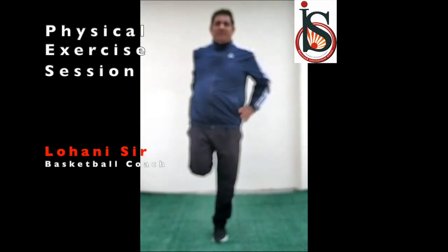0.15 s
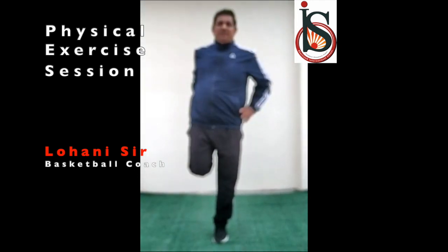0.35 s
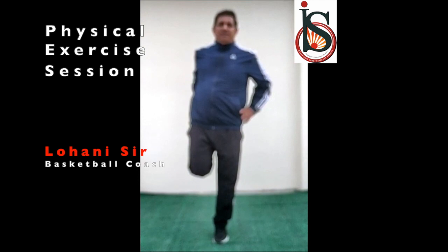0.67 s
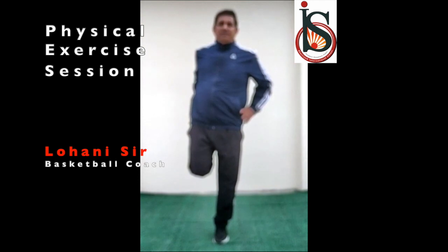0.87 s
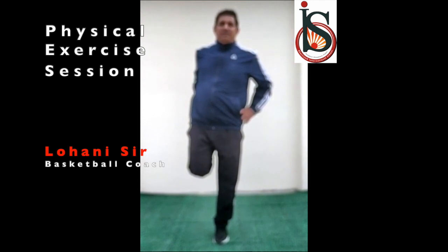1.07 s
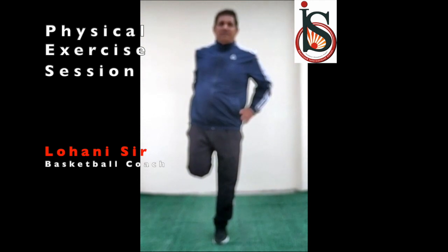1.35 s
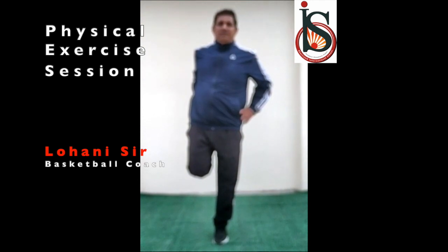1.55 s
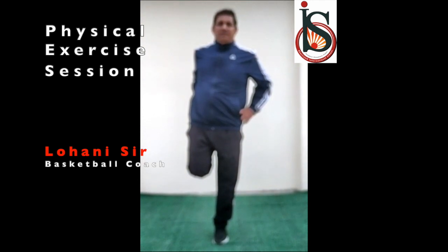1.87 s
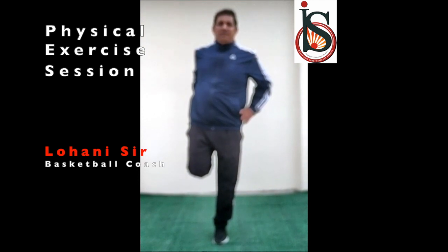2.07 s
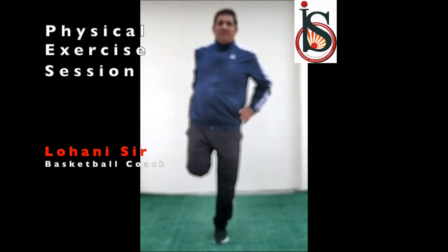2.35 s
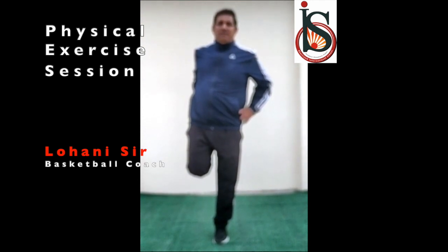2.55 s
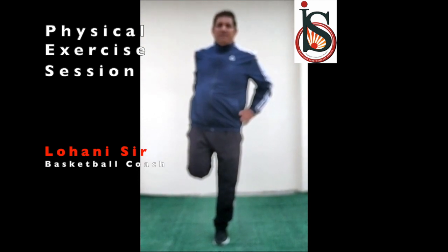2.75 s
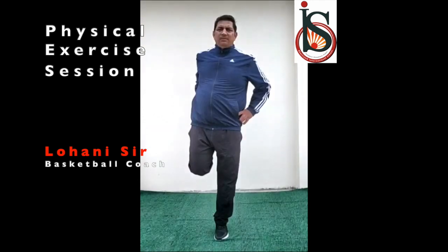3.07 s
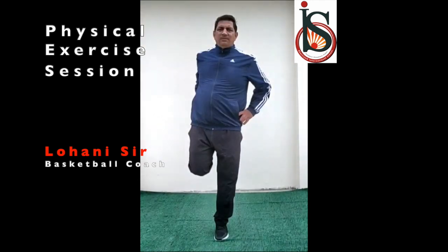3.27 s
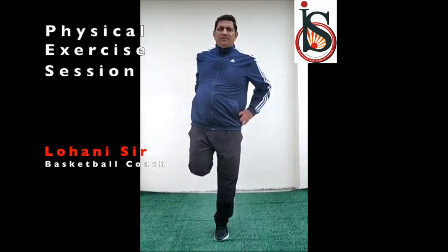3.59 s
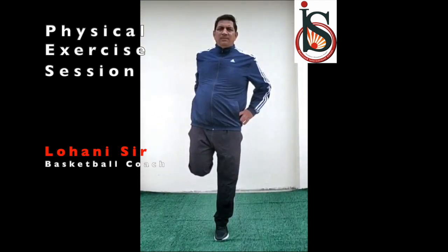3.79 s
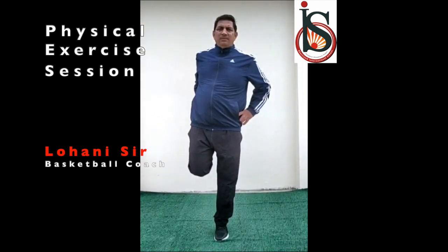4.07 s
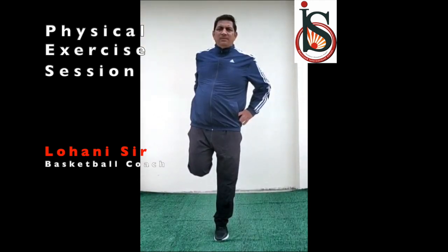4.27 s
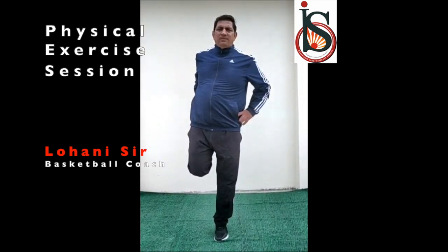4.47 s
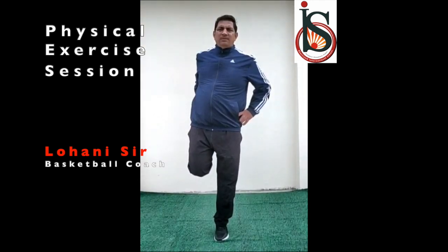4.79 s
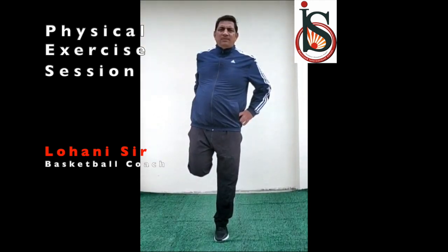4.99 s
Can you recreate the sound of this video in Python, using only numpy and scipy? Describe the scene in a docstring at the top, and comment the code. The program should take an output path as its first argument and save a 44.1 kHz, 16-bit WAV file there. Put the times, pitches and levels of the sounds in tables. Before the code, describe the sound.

Outdoors among walls, a dove-like bird repeats short, hoarse hoots over a faint low background hum. A nearer bird gives two sharp, falling chirps, and air thumps softly on the right side of the microphone. The hoots pause briefly and resume. Near the end, whistles and chips of farther birds crowd in, with a third sharp chirp and a few more thumps.

```python
"""Outdoors among walls, over a quiet murmur, a dove-like bird starts short hoots, hoarse from the uneven
airflow in its throat. From about 1 s, pushes of air thump softly on the right microphone port. A nearer
bird gives sharp, falling chirps through its opening beak at 1.3 s and 2.8 s. The hoots pause, then resume
at 3.5 s. In the last second the chips and whistles of farther birds crowd in, with a few more thumps
and a third chirp at 4.9 s."""
import sys
import numpy as np
from scipy import signal
from scipy.fft import rfft, irfft, next_fast_len
from scipy.io import wavfile
from scipy.ndimage import uniform_filter1d, map_coordinates

SR = 44100
rng = np.random.default_rng(int(sys.argv[2]) if len(sys.argv) > 2 else 0)


def wav_record(signal):
    """Record a signal, one row per channel, as 16-bit PCM in the file named by sys.argv[1]."""
    frames = np.transpose(np.atleast_2d(signal))
    bounded = np.clip(frames, -1, 1)
    # unit amplitude maps onto the largest positive 16-bit level
    quanta = np.round(bounded * 32767).astype(np.int16)
    wavfile.write(sys.argv[1], SR, quanta)


N = 226385
TIME = np.arange(N) / SR


def amp(db):
    """Decibels to gain."""
    return 10 ** (np.asarray(db) / 20)


def unit(x):
    """Scale to rms 1."""
    return x / np.sqrt(np.mean(np.abs(x) ** 2) + 1e-20)


def along(points, hz):
    """Read (freq_hz, value) points on a log frequency axis."""
    freqs, values = np.transpose(points)
    return np.interp(np.log(hz + 1), np.log(freqs + 1), values)


def wobble(rate, size):
    """A smooth random modulator, rate knots a second."""
    knots = rng.standard_normal(int(size * rate / SR) + 4)
    return map_coordinates(knots, [np.arange(size) * rate / SR])


def filtered(x, response):
    """Apply a frequency response."""
    size = next_fast_len(N + 8192)
    return irfft(rfft(x, size) * response(np.fft.rfftfreq(size, 1 / SR)), size)[..., :N]


def eq(x, curve):
    """Colour a sound with (freq_hz, gain_db) points."""
    return filtered(x, lambda hz: amp(along(curve, hz)))


def noise(curve, side_db):
    """Coloured stereo noise of rms 1; side_db sets the width."""
    mid, side = eq(rng.standard_normal((2, N)), curve)
    return unit(np.array([mid + amp(side_db) * side, mid - amp(side_db) * side]))


def patchy(x, depth_db):
    """Random patches of gain over time and frequency, scaled to rms 1."""
    spectra = signal.stft(x, nperseg=512)[2]
    patches = uniform_filter1d(rng.standard_normal(spectra.shape[1:]), size=6, axis=0)
    patches = unit(uniform_filter1d(patches, size=12, axis=1))
    return unit(signal.istft(spectra * amp(depth_db * patches), nperseg=512)[1][:, :N])


def add(track, start_s, sound, pan_db):
    """Place a sound in a stereo track; pan_db is left minus right."""
    gains = amp([[pan_db / 2], [-pan_db / 2]])
    part = track[:, max(round(start_s * SR), 0):][:, :sound.shape[-1]]
    part += gains / gains.mean() * sound[..., :part.shape[1]]


def gate(t, fade_s):
    """Fade a note in and out."""
    return np.sin(np.pi / 2 * np.clip(np.minimum(t - t[0], t[-1] - t) / fade_s, 0, 1)) ** 2


def phase_of(hz):
    """Running phase of a pitch curve."""
    return 2 * np.pi * np.cumsum(hz) / SR


# Fader rides of the ambience: time_s, murmur_db, rustle_db
BED_RIDES = [(0.0, -60.5, -64.5), (0.31, -62, -72), (1.07, -67, -71.5), (1.51, -58, -68.5),
             (1.94, -64, -74.5), (2.83, -65, -72), (3.01, -62, -62.5), (3.79, -62.5, -67),
             (4.26, -66.5, -79), (4.46, -55, -63.5), (4.73, -63, -60.5), (5.13, -54, -51)]
# Tone of the three noise beds: freq_hz, gain_db
MURMUR_EQ = [(25, -23.5), (60, -3.5), (85, -14.5), (104, 6.5), (125, -16.5), (190, -2.5), (320, 5.5),
             (450, -4), (660, 0.5), (850, -11.5), (1200, -25), (2500, -53)]
RUSTLE_EQ = [(600, -13), (1200, -12.5), (1900, 3.5), (2800, -12), (3900, -5), (5200, -16.5), (8000, -26.5),
             (15000, -29)]
HISS_EQ = [(500, 7), (3000, 3.5), (6500, 2), (9000, 3.5), (11000, 2), (14000, 5), (15200, 2.5)]
def ambience(murmur_trim_db=5.0, rustle_trim_db=-1.5, hiss_db=-70):
    """The bed: a low distant murmur, an uneven far-off rustle and the microphone's hiss."""
    times, murmur_db, rustle_db = np.transpose(BED_RIDES)
    murmur = patchy(noise(MURMUR_EQ, side_db=-13.5), depth_db=3)
    murmur *= amp(np.interp(TIME, times, murmur_db) + murmur_trim_db)
    rustle = patchy(noise(RUSTLE_EQ, side_db=-3.5), depth_db=4.5)
    rustle *= amp(np.interp(TIME, times, rustle_db) + rustle_trim_db)
    hiss = amp(hiss_db) * patchy(noise(HISS_EQ, side_db=0.5), depth_db=2.0)
    return murmur + rustle + hiss


# Ring time of the yard, before decay_scale: freq_hz, t60_s
YARD_DECAY = [(150, .4), (700, .6), (2000, 0.6), (4000, 0.87), (7000, 0.75), (12000, 0.067)]
def yard_reverb(x, decay_scale, predelay_s):
    """The walls answer with a diffuse tail whose top end dies first."""
    hz, t, spectra = signal.stft(rng.standard_normal((2, SR)), SR, nperseg=256)
    t60_s = decay_scale * along(YARD_DECAY, hz)[:, None]
    tail = signal.istft(spectra * amp(-60 * t / t60_s), SR, nperseg=256)[1]
    tail = np.pad(tail / np.linalg.norm(tail[0]), ((0, 0), (int(predelay_s * SR), 0)))
    return signal.fftconvolve(x, tail, axes=1)[:, :N]


def reflections(x, first_s, spread_s, count):
    """A few separate bounces, different at each microphone port."""
    delays = first_s + spread_s * rng.random((count, 2, 1))
    return filtered(x, lambda hz: np.exp(-2j * np.pi * hz * delays).sum(0)) / np.sqrt(count)


# What a farther wall sends back: freq_hz, gain_db
FAR_WALL_EQ = [(1500, -5.5), (3500, 3), (4400, -4.5), (5500, -7.5), (9000, -27.5)]
def slapback(x):
    """A farther wall returns a late, dull repeat."""
    return reflections(eq(x, FAR_WALL_EQ), first_s=.065, spread_s=.03, count=3)


def chatter(count=36, level_db=-75, spread_db=2.0, middle_hz=3100, glide=0.085):
    """Many birds far away: a sprinkle of faint, mostly falling glides."""
    out = np.zeros((2, N))
    for when, (pitch, slope, life, size, side) in zip(rng.random(count), rng.standard_normal((count, 5))):
        t = np.arange(int(.04 * np.exp(.3 * life) * SR)) / SR
        hz = middle_hz * np.exp(.2 * pitch + glide * (slope - 1) * t / t[-1])
        note = amp(level_db + spread_db * size) * np.sin(phase_of(hz)) * gate(t, t[-1] / 2)
        add(out, when * N / SR, note, pan_db=3 * side)
    return out


# Faint low coos: start_s, length_s, pitch_hz, level_db
COOS = [(0.143, 0.075, 334, -58), (0.586, 0.031, 350, -47), (0.76, 0.049, 337, -53.5),
        (4.345, .125, 335, -51), (5.068, 0.066, 352, -57.5)]
# Distant caws: start_s, length_s, level_db
CAWS = [(0.172, 0.27, -64), (0.658, 0.35, -69)]
# Rasp of a caw: freq_hz, gain_db
CAW_EQ = [(900, -27.5), (1350, 5), (1600, 7), (1900, 10), (2200, -21.5), (3000, -35.5)]
def coos_and_caws(waver=0.055):
    """Wavering sine coos and caws of swelling noise, tucked into the murmur."""
    out, rasp = np.zeros((2, N)), noise(CAW_EQ, side_db=-13.5)
    for start, length, hz, db in COOS:
        t = np.arange(int(length * SR)) / SR
        tone = unit(np.sin(phase_of(hz * (1 + waver * wobble(63, len(t))))))
        add(out, start, amp(db) * tone * gate(t, fade_s=0.013), pan_db=0)
    for start, length, db in CAWS:
        out += amp(db) * rasp * np.sin(np.pi * np.clip((TIME - start) / length, 0, 1))
    return out


# Calls of farther birds: start_s, length_s, from_hz, to_hz, level_db, pan_db
CHIPS = [(0, 0.033, 5180, 5107, -59.5, -4), (0.267, 0.35, 3420, 2954, -77.5, -28),
         (0.625, 0.057, 4660, 4730, -78, -9.5), (0.761, 0.084, 3074, 2260, -58, -10),
         (0.926, 0.035, 2190, 1938, -48, -19), (1.512, 0.03, 5100, 5720, -59.5, -12),
         (2.093, 0.032, 2930, 2770, -69.5, -12), (2.293, 0.041, 4950, 5230, -64, -12),
         (2.563, 0.036, 4260, 5410, -73, -14.5), (3.376, 0.029, 4140, 3966, -56, 8.5),
         (3.608, 0.1, 2885, 2465, -62.5, -16.5), (4.235, 0.04, 1738, 2430, -59, -9.5),
         (4.263, 0.1, 4460, 3810, -63, 15), (4.291, 0.06, 2940, 2320, -45.5, -6.5),
         (4.322, 0.05, 4185, 3420, -52, -2), (4.399, 0.071, 5310, 5050, -65, -3.5),
         (4.454, 0.055, 2078, 1808, -50, -29), (4.573, .055, 4120, 3276, -52, -9.5),
         (4.614, 0.068, 2047, 1900, -45.5, -24), (4.663, 0.022, 4640, 5170, -65, 0),
         (4.76, 0.015, 2450, 2670, -55, 9), (4.799, 0.059, 2176, 2510, -57, -14),
         (4.831, 0.085, 3745, 3430, -48, -15), (4.85, 0.046, 3260, 2454, -39, -7),
         (4.888, 0.048, 2500, 2030, -52.5, 25), (4.979, 0.052, 2120, 1810, -48, -12),
         (5.021, 0.041, 2192, 2440, -37, -0.5), (5.082, 0.039, 3900, 3300, -50, -3)]
def chips(overtone_db=-32, shimmer_db=1.5, jitter=.018):
    """Short, slightly unsteady whistled glides, each swelling and fading."""
    out = np.zeros((2, N))
    for start, length, from_hz, to_hz, db, pan_db in CHIPS:
        t = np.arange(int(length * SR)) / SR
        phase = phase_of(np.geomspace(from_hz, to_hz, len(t)) * (1 + jitter * wobble(450, len(t))))
        tone = np.sin(phase) + amp(overtone_db) * np.sin(2 * phase)
        voice = unit(tone * amp(shimmer_db * wobble(140, len(t))))
        add(out, start, amp(db) * voice * gate(t, fade_s=.22 * length), pan_db)
    return out


# Flutters of air on the microphone ports: start_s, length_s, level_db (before trim), pitch_hz, pan_db
THUMPS = [(0.863, 0.034, -38.5, 83, -21), (1.288, .01, -40, 71, -24), (1.447, 0.15, -21, 104, -31.5),
          (1.819, 0.013, -23.5, 113, -44), (1.889, 0.14, -16, 110.3, -45),
          (2.129, 0.0056, -31.5, 99, -17.5), (2.307, 0.13, -34, 83, -6.5), (2.464, 0.041, -30, 101, -29),
          (4.42, 0.058, -48, 134.4, -20), (4.577, 0.11, -28.5, 82, -32), (4.897, .01, -33, 81, -12)]
def thumps(gap_s=.019, scatter_s=.0033, scatter_db=1.5, detune=.13, flutter=.26, trim_db=-7.0):
    """A run of air pushes swells and dies; each push swings the diaphragm for a cycle or two."""
    out, t = np.zeros((2, N)), np.arange(SR // 12) / SR
    for start, length, db, hz, pan_db in THUMPS:
        rise_s = 0.27 / hz
        for offset, (shift, size, stretch) in zip(np.arange(0, length, gap_s), rng.standard_normal((12, 3))):
            contour_db = np.interp(offset / length, [0, 0.23, 1], [-3, 0, -15])
            gain = amp(db + trim_db + contour_db + scatter_db * size)
            swing = -np.sin(2 * np.pi * hz * np.exp(detune * stretch) * t)
            swing += flutter * wobble(7 * hz, len(t))
            envelope = (t / rise_s / 2) ** 2 * np.exp(2 - t / rise_s)
            add(out, start + offset + scatter_s * shift - rise_s, gain * swing * envelope, pan_db)
    return out


def chirp_pitch(t, length, overshoot_s=.015, settle_s=.014, drop=.375):
    """Ratio to the held pitch: flick up from flat, settle, then dive ever faster as the voice frays."""
    progress = t / length
    flick = 1 - .2 * np.exp(-t / settle_s) * np.cos(np.pi * t / overshoot_s)
    bends = 1 + .0097 * progress * wobble(64, len(t))
    fray = 1 + .009 * progress * wobble(350, len(t))
    return flick * bends * fray * (1 - drop * progress ** 2.55)


def chirp_envelope(t, length, attack_s, release_s=.033):
    """A chirp's gain: a brief accent, a ramp up, a shimmering hold and a release."""
    accent_db = 7.5 * np.exp(-t / .0081)
    attack_db = -14 * np.maximum(1 - t / attack_s, 0)
    shimmer_db = 1.5 * wobble(170, len(t))
    release_db = -13.5 * np.maximum(1 - (length - t) / release_s, 0)
    return amp(accent_db + attack_db + shimmer_db + release_db) * gate(t, fade_s=.0035)


# The nearer bird's chirps, with trims for partials 1, 3 and 4-6:
# start_s, length_s, held_hz, level_db, attack_s, pan_db, first_db, third_db, upper_db
CHIRPS = [(1.28, 0.15, 2190, -33, 0.058, -3, 1, 1.5, -3.5),
          (2.806, 0.142, 2169, -28, 0.028, -0.5, 1, -5, 4.5),
          (4.871, .146, 2056, -30, 0.029, 0.5, -5.5, -12.5, -0.5)]
# Resonance of its throat and beak: freq_hz, gain_db
BEAK_EQ = [(1500, -34.5), (1850, -23), (2100, -4.5), (2700, -7.5), (3400, -4), (4300, 1), (5000, 0),
           (5650, -2.5), (6400, -26), (7300, -25.5), (8400, -15.5), (9500, -26), (11500, -45.5),
           (14000, -62)]
def chirps(odd_db=-3, closed_db=-17, open_share=.42, flicker_db=3.5, ending_db=-14, left_lag_s=.00003):
    """A harmonic stack slides through the beak resonance; upper partials come in as the beak opens."""
    out = np.zeros((2, N))
    k = np.arange(1, 7)[:, None]  # partial numbers
    dying_share = np.minimum(np.abs(k - 2) / 2 + (k == 1), 1)  # the outer partials die first
    for start, length, held_hz, db, attack_s, pan_db, first_db, third_db, upper_db in CHIRPS:
        t = np.arange(int(length * SR)) / SR
        hz = held_hz * chirp_pitch(t, length)
        flicker = np.array([wobble(75.8, len(t)) for _ in k])
        rasp = np.array([wobble(700, len(t)) for _ in k])
        colour_db = np.array([first_db, 0, third_db] + 3 * [upper_db])[:, None] + odd_db * (k % 2)
        opening_db = closed_db * np.clip(1 - t / length / open_share, 0, 1) + flicker_db * flicker
        fading_db = ending_db * (t / length) ** 2 * dying_share
        gains = amp(along(BEAK_EQ, k * hz) + colour_db + (k > 2) * opening_db + fading_db)
        phases = k * phase_of(hz) + .25 * (k > 2) * rasp
        left = (gains * np.sin(phases - 2 * np.pi * k * hz * left_lag_s)).sum(0)
        right = (gains * np.sin(phases)).sum(0)
        voice = np.array([left, right]) / np.sqrt((gains ** 2).sum(0) / 2)
        add(out, start, amp(db) * voice * chirp_envelope(t, length, attack_s), pan_db)
    return out


def hoarse_tone(hz, flutter=.62, flutter_hz=125, rasp_db=-17, rasp_hz=240, right_lag_s=.00005):
    """Uneven airflow shakes a tone's strength and phase."""
    def shake(rate):
        return wobble(rate, len(hz)) + 1j * wobble(rate, len(hz))
    flow = 1 + flutter * shake(flutter_hz) + amp(rasp_db) * shake(rasp_hz)
    flow /= np.sqrt(uniform_filter1d(np.abs(flow) ** 2, size=700))  # quick shaking, steady effort
    phase = phase_of(hz) - 2 * np.pi * hz * [[0], [right_lag_s]]
    return unit((flow * np.exp(1j * phase)).real)


def voice_breaks(t, surge_db, catch_lead_s, catch_db, catch_width_s=.008, surge_width_s=.022):
    """Gain of a voice that catches (a blip between two dips), then surges at its peak, t = 0."""
    distance_sq = ((t + catch_lead_s) / catch_width_s) ** 2
    catch = (1 - distance_sq) * np.exp(-distance_sq / 2)
    surge = np.exp(-(t / surge_width_s) ** 4)
    return amp(catch_db * catch + surge_db * surge)


# The dove-like bird's hoots, levels before the throat and breath gains:
# peak_s, level_db, pitch_hz, rise_s, fall_s, surge_db, catch_lead_s, catch_db
HOOTS = [(0.019, -44, 683.0, 0.41, 0.069, 9, 0.1, -0.0), (0.337, -30.5, 685.0, 0.1, 0.087, 3.5, 0.079, 4.5),
         (0.636, -47.7, 684.0, 0.1, 0.062, 8.5, 0.066, 7), (0.776, -55.0, 691.0, 0.077, 0.071, 2, 0.031, 6),
         (0.986, -61, 680.0, 0.066, 0.049, 3.5, 0.044, 10),
         (1.238, -32.5, 678.0, 0.043, 0.102, 2.5, 0.025, 5),
         (1.573, -32.5, 673.8, 0.086, 0.076, -2.5, 0.035, 14),
         (1.862, -52.5, 659.7, 0.131, 0.117, 7, 0.065, 3),
         (2.099, -34, 690.3, 0.063, 0.083, 4, 0.072, 15.5),
         (2.296, -53.5, 638.6, 0.12, 0.2, -0.0, 0.036, 1), (2.386, -50, 687.5, 0.016, 0.042, 4.5, 0.024, 4),
         (2.498, -58, 658, 0.15, 0.22, 0, 0.048, -1.2), (3.533, -27.5, 693, 0.046, 0.06, -0.0, 0.044, 14),
         (3.848, -33.5, 668.5, 0.088, 0.115, 0.5, 0.064, 11),
         (4.134, -52.5, 677.4, 0.067, 0.041, 3.5, 0.045, 6),
         (4.202, -52.5, 660.0, 0.043, 0.167, 7, 0.033, 3.5),
         (4.528, -30, 700.3, 0.076, 0.049, -0.0, 0.079, 5.5), (4.927, -33, 695.0, 0.15, 0.093, 4, 0.05, 12)]
# Resonance of its swollen throat: freq_hz, gain_db
THROAT_EQ = [(300, -21), (500, -7), (600, 1), (700, 6.5), (765, -13), (950, -1.5), (1200, -13)]
# Husky colour of its breath: freq_hz, gain_db
BREATH_EQ = [(150, -43.5), (330, -21), (450, -7.5), (560, 2), (660, 18), (780, 0), (900, -8.5),
             (1000, -20.5), (1120, -41), (1400, -32.5), (2000, -57.5)]
def hoots(hold_s=.008, fade_db=18.5, span=1.55, scoop_hz=41.86, sag_hz=20.9, wander_hz=18, pan_db=-4.0):
    """A hoarse tone swells and fades in the throat, its pitch arching with the effort; breath rides on it."""
    tones, breaths = np.zeros((2, 2, N))
    breath = noise(BREATH_EQ, side_db=-7)
    for peak_s, db, hz, rise_s, fall_s, surge_db, catch_lead_s, catch_db in HOOTS:
        start = max(peak_s - hold_s - span * rise_s, 0)
        t = np.arange(start - peak_s, hold_s + span * fall_s, 1 / SR)
        # distance from the held peak, in rise times and in fall times
        before, after = np.maximum((-t - hold_s) / rise_s, 0), np.maximum((t - hold_s) / fall_s, 0)
        pitch_hz = hz - scoop_hz * before ** 2 - sag_hz * after ** 2 + wander_hz * wobble(60, len(t))
        effort = amp(db - fade_db * (before + after)) * gate(t, fade_s=.006)
        voice = hoarse_tone(pitch_hz) * voice_breaks(t, surge_db, catch_lead_s, catch_db)
        add(tones, start, voice * effort, pan_db)
        first = int(start * SR)
        add(breaths, start, breath[:, first:first + len(t)] * effort[:N - first], pan_db)
    return eq(tones, THROAT_EQ) + breaths


def scene():
    """The mix: ground and near walls answer quickly, the surroundings linger; far birds are wetter."""
    dove, near = hoots(), chirps()
    far = chips() + chatter() + coos_and_caws()
    ground = reflections(amp(-9.5) * near + amp(-1) * far, first_s=.0014, spread_s=.0065, count=4)
    slap = slapback(amp(-21) * near)
    short_send = amp(-12.5) * (dove + near) + amp(-3) * far
    long_send = amp(-23.5) * dove + amp(-33) * near + amp(-22) * far
    walls = yard_reverb(short_send, decay_scale=0.21, predelay_s=.012)
    surroundings = yard_reverb(long_send, decay_scale=1.4, predelay_s=.04)
    return dove + near + far + ground + slap + walls + surroundings + thumps() + ambience()


def record(dry, low_cut_hz=42, top_hz=15600):
    """The microphone rolls off the deepest bass and keeps nothing above its band limit."""
    return filtered(dry, lambda hz: (hz < top_hz) * hz ** 2 / np.hypot(hz ** 2, low_cut_hz ** 2))


dry = scene()
out = record(dry)
wav_record(out)
```